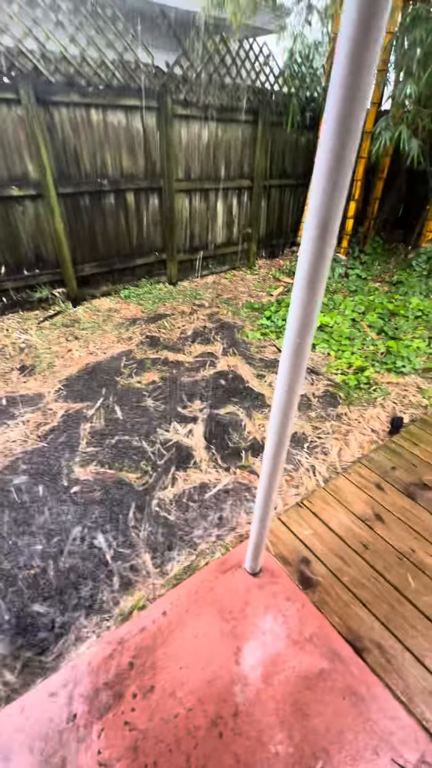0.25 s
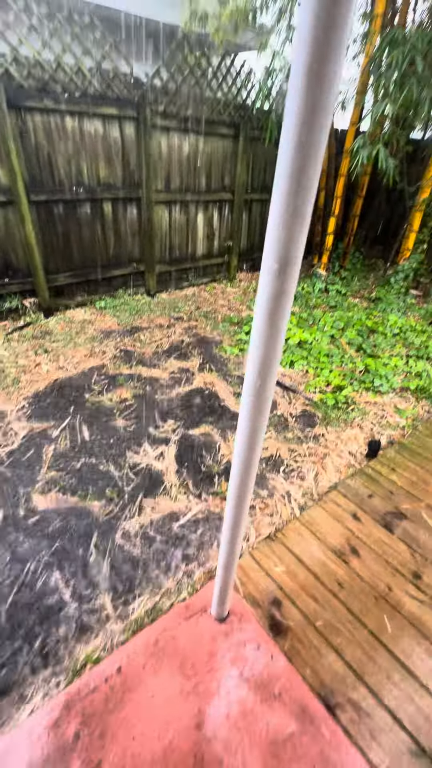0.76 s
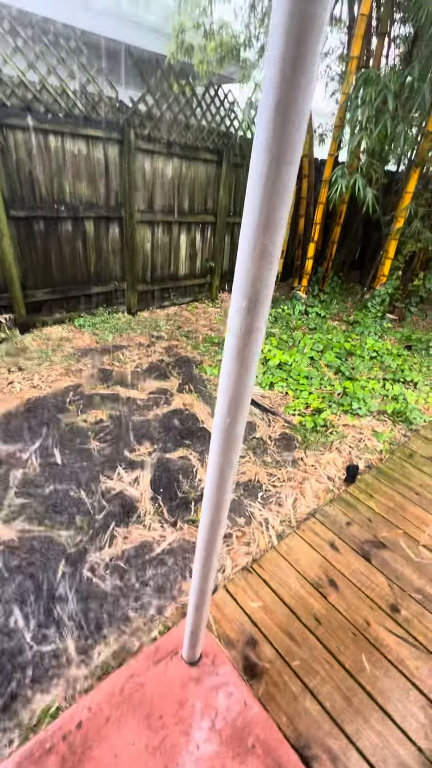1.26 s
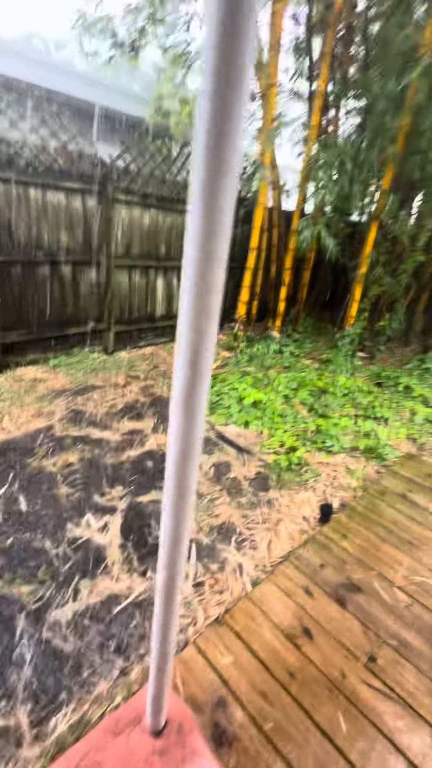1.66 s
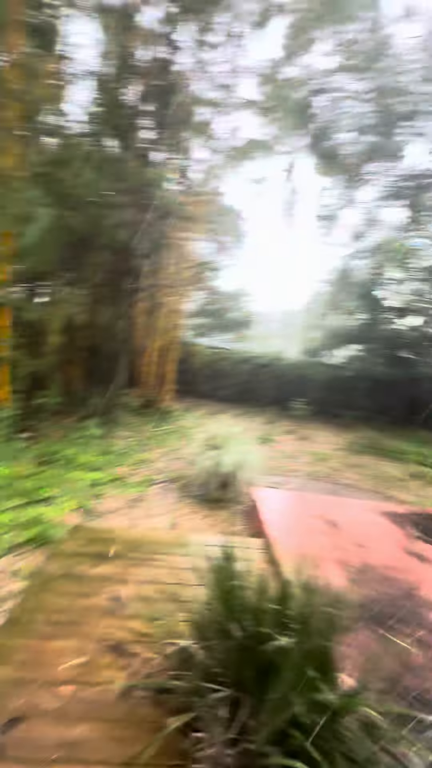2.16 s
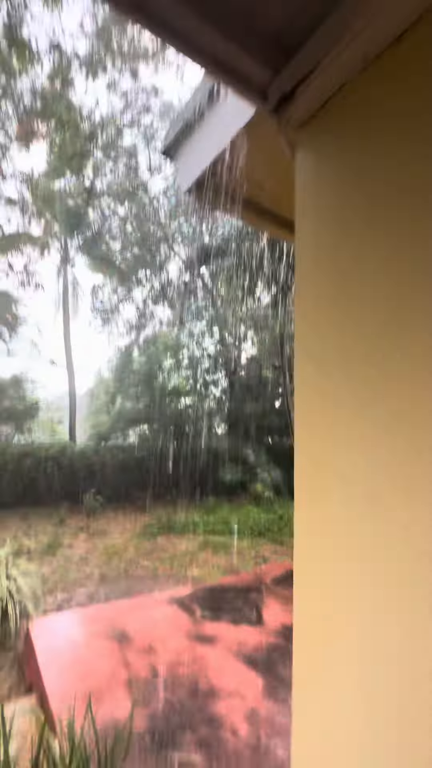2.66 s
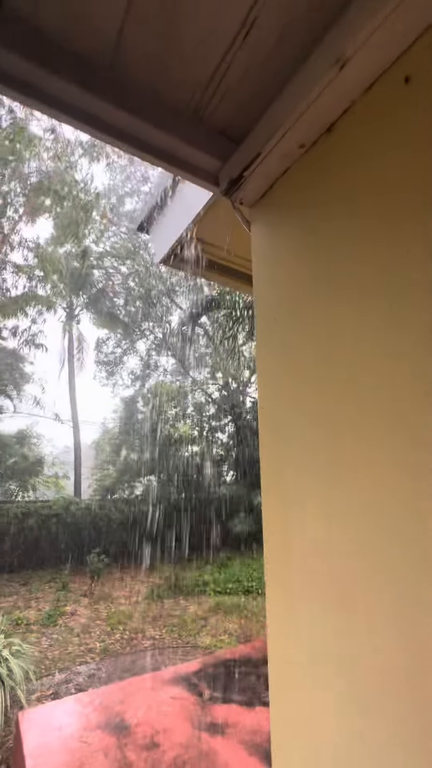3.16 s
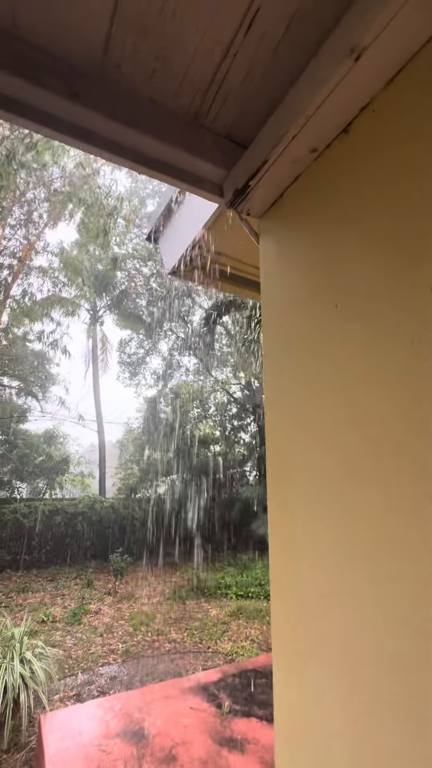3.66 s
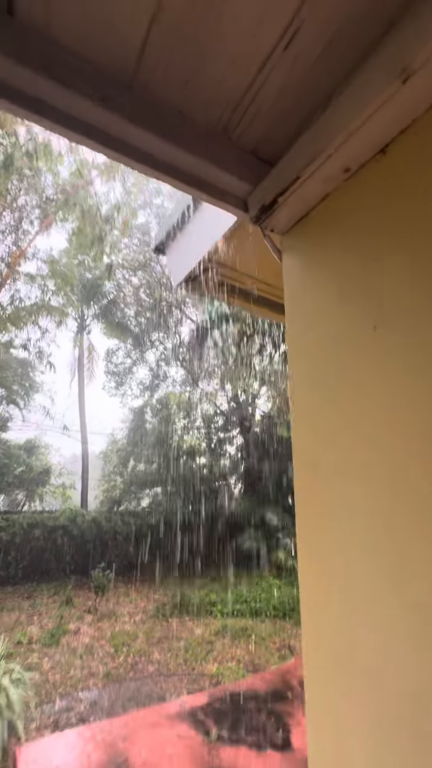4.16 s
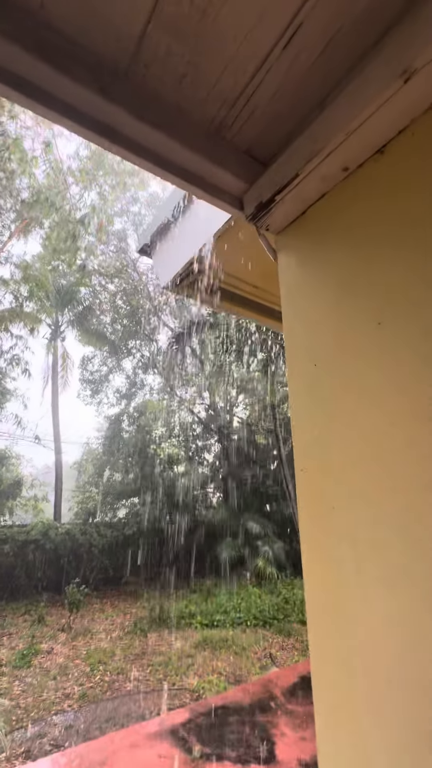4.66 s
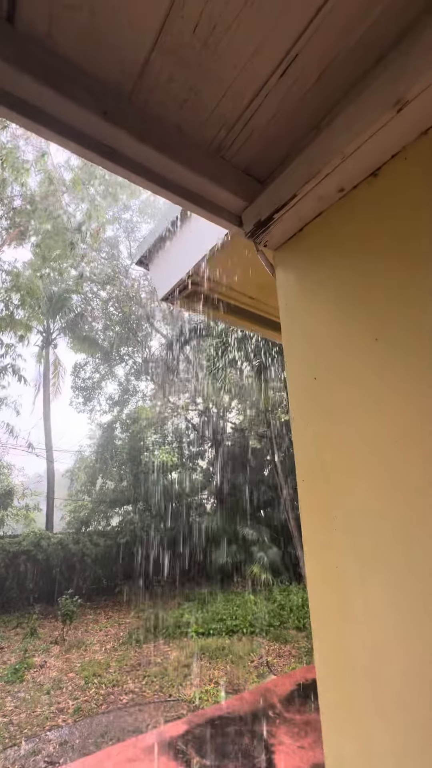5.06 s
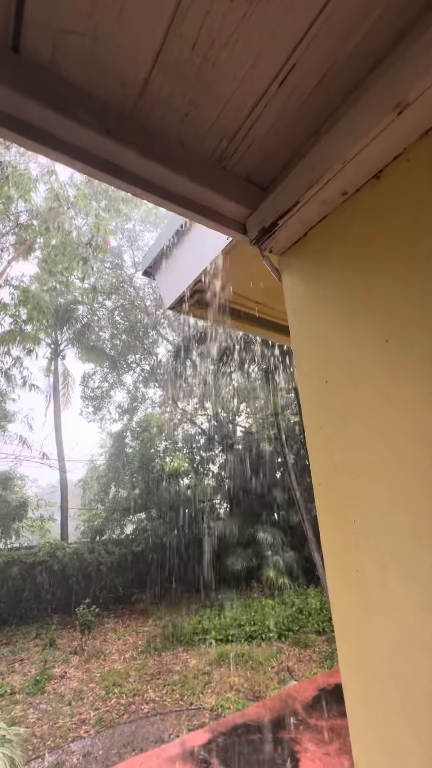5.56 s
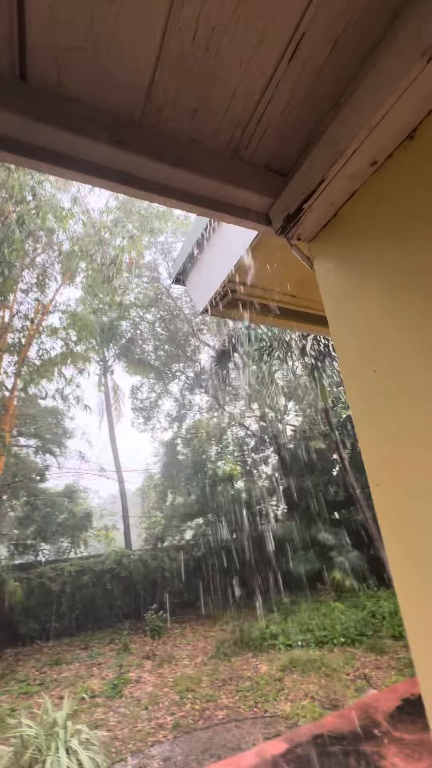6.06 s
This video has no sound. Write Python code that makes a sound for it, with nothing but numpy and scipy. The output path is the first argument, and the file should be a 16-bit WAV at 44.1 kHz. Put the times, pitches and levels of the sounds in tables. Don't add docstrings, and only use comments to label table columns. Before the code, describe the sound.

Heavy rain in a backyard, heard from under a roof overhang with a close stereo microphone. At first it is bright and open, with many crisp nearby drops and a faint gutter hum under a drumming roof. Around two seconds the microphone turns toward the dripping eaves: the patter gets duller, close drops become sparser, the gutter fades, and runoff keeps splashing in uneven gulps.

```python
import sys
import numpy as np
from scipy import signal
from scipy.fft import rfft, irfft, next_fast_len
from scipy.io import wavfile
from scipy.ndimage import uniform_filter1d

SR = 44100
rng = np.random.default_rng(int(sys.argv[2]) if len(sys.argv) > 2 else 0)


def generate_wav(signal):
    frames = np.transpose(np.atleast_2d(signal))
    scaled = np.clip(frames, -1, 1) * 32767
    pcm = np.round(scaled).astype(np.int16)
    wavfile.write(sys.argv[1], SR, pcm)


def gain_from_decibels(decibels):
    exponent = np.asarray(decibels, float) / 20
    return 10 ** exponent


N = 277830
CONTROL_STEP = 40

# (time [s], share facing the eaves [0-1])
TURN = [
    (1.75, 0.09),
    (2.6, 1),
]
# (time [s], level [dB])
UNDER_RAFTER = [
    (3.5, -1),
    (3.75, 3),
]

# (frequency [Hz], width [Hz], level [dB])
ROOF_MODES = [(65, 9.7, 0), (83.2, 22, -6)]
# (frequency [Hz], width [Hz], rms level [dB])
RAFTER_MODE = (107, 9.6, -44)
# (frequency [Hz], width [Hz], level [dB])
GUTTER_MODE = (306.3, 18.3, 1.5)
# (start [s], length [s], level [dB])
ROOF_BURSTS = [(0.071, 0.035, -36), (0.36, 0.146, -36), (0.96, 0.12, -37), (1.272, 0.04, -36),
               (1.843, 0.092, -35), (2.37, 0.104, -35), (2.563, 0.095, -35), (2.849, 0.11, -37),
               (3.016, 0.189, -34.5), (3.25, 0.13, -35), (3.405, 0.06, -38), (3.567, 0.19, -35.5),
               (3.838, 0.23, -36.5), (4.08, 0.2, -38.5), (4.29, 0.038, -32), (4.413, 0.25, -36.5),
               (5.078, 0.09, -34), (5.235, 0.12, -35.5), (5.415, 0.035, -35), (5.62, 0.03, -39),
               (5.76, 0.104, -36), (5.916, 0.096, -30.5)]

# (time [s], peak level [dB], ring [Hz],
# left-right level [dB], lag of right port [microseconds])
LARGE_DROPS = [(0.044, -24.5, 2500, -12, 172), (0.189, -17, 2700, 5, 202), (0.229, -16, 2700, -1, 200),
               (0.428, -19, 7900, 2, 70), (0.44, -14.5, 3480, -6, 199), (0.475, -23.5, 2680, -1, 200),
               (0.541, -14, 2500, 5, 257), (0.55, -23, 3300, -15, 262), (0.639, -17.5, 7500, 0, 201),
               (0.717, -20, 2900, 3, 232), (0.768, -13.5, 8300, 2, 180), (0.855, -18, 8100, -0.5, 199),
               (1.139, -18.5, 9200, 0, 191), (1.2, -18.5, 3080, 6, 242), (1.209, -15, 4330, -3, 232),
               (1.281, -16.5, 2500, -2, -230), (1.333, -19.5, 2590, 4, 230), (1.434, -20, 9700, 5, -250),
               (1.541, -15.5, 2840, -4, 230), (1.606, -11, 3800, -0.5, -250), (1.763, -14, 7500, -5, 74),
               (1.809, -18, 7500, 1, 67), (1.819, -21, 2900, 17, 37),
               (2.258, -16.5, 2460, -4.5, 166), (2.346, -22, 4330, -16, 161), (2.372, -20, 3400, 3, 165),
               (2.526, -22, 2950, -12, 155), (2.737, -16, 2690, 3, 189), (2.85, -24, 2800, 5, -200),
               (2.86, -18.5, 3430, 4, -140), (3.193, -20, 4800, -5, 135), (3.867, -19.5, 2520, -5, 57),
               (4.083, -22.5, 3260, 4.5, 66), (4.496, -16, 7900, 5, 36), (4.963, -14.5, 5940, -1, 160.5),
               (5.036, -23.5, 2580, -10, -270), (5.197, -16, 6030, 1, 109), (6.172, -18, 5230, -8, -79)]

# (time [s], level [dB])
DOWNPOUR = [(0.0, 1), (0.55, 0.4), (0.9, 0.8), (1.3, 0.6), (1.9, 0), (2.05, -1), (2.3, -1), (2.7, -0.8),
            (3.5, -0.3), (4.4, 0.7), (4.7, 0.2), (5.3, -0.1), (5.8, -0.2), (6.0, 0.6), (6.3, 1)]
# (time [s], swell [dB], centre frequency [Hz])
GULPS = [(0.17, 6.5, 5000), (0.27, 5, 1800), (0.3, 4, 3200), (0.46, 3, 4000), (0.55, 2.5, 2500),
         (0.65, 3.5, 3000), (0.85, 1, 900), (1.02, 1.5, 5000), (1.2, 5, 1300), (1.4, 2.5, 3000),
         (1.6, 1, 3500), (1.7, 1, 4000), (1.98, 2.5, 1000), (2.36, 3, 4500), (2.41, 5, 1000),
         (2.52, 1.5, 1200), (2.86, 4.5, 5000), (3.16, 2, 4000), (3.48, 4.5, 1100), (3.56, 2.5, 900),
         (3.88, 3, 3500), (4.38, -1.5, 3000), (4.5, -1.5, 6000), (4.84, 2.5, 1100), (4.96, 4, 4500),
         (5.22, 1.5, 5000), (5.51, 4, 3500), (5.96, 2, 1300), (6.04, 1, 5000), (6.17, 2, 4000)]
# (frequency [Hz], share [0-1])
GUSTINESS = [(4000, 0.86), (7000, 0.63), (12000, 0.27)]
# (frequency [Hz], density [dB per Hz])
SUM_YARD = [(40, 1), (150, -4.5), (400, -6.5), (900, -9), (1800, -9.5), (2500, -10.5), (3100, -5),
            (3900, -7), (5000, -8.5), (6100, -7.0), (7300, -10.5), (9000, -7.5), (10200, -11),
            (15500, -17.5)]
# (frequency [Hz], density [dB per Hz])
SUM_EAVES = [(40, 1.5), (150, -5.5), (400, -7.5), (900, -8), (1800, -10.5), (2500, -9), (3100, -6.5),
             (3900, -7.5), (5000, -10), (6100, -6), (7300, -11.5), (9000, -10.5), (10200, -13.5),
             (15500, -19.5)]
# (frequency [Hz], density [dB per Hz])
DIFF_YARD = [(40, -16), (200, -23.5), (450, -10), (850, -5.5), (1700, -10.5), (2100, -4.5), (2550, 1),
             (3000, -2.2), (3900, -13.5), (5000, -6.5), (6300, -6.5), (7700, -2.1), (11000, -8),
             (15500, -10.5)]
# (frequency [Hz], density [dB per Hz])
DIFF_EAVES = [(40, -16), (200, -24), (450, -12.5), (850, -7), (1700, -13), (2100, -7.5), (2550, -1),
              (3000, -5), (3900, -11), (5000, -5), (6300, -9), (7700, -6.5), (11000, -9.5), (15500, -13)]
# (frequency [Hz], in phase [-1..1], a quarter cycle ahead [-1..1])
LEAK_YARD = [(200, -0.17, -0.012), (500, -0.17, 0.18), (900, 0.03, 0.33), (1400, 0.0063, 0.28),
             (1750, -0.03, 0.09), (2500, -0.04, -0.04), (3100, -0.19, -0.24), (3800, -0.03, -0.09),
             (5000, 0.054, 0.01), (6200, -0.16, -0.03), (7500, -0.084, -0.1), (8500, 0.12, -0.31),
             (9500, 0.2, -0.52), (15200, -0.02, 0.46)]
# (frequency [Hz], in phase [-1..1], a quarter cycle ahead [-1..1])
LEAK_EAVES = [(200, -0.16, -0.13), (500, -0.19, 0.02), (900, -0.21, 0.25), (1400, -0.2, 0.36),
              (1750, -0.22, 0.22), (2500, -0.02, 0.2), (3100, 0.1, 0.01), (3800, 0.04, 0.03),
              (5000, -0.02, -0.09), (6200, -0.17, -0.13), (7500, -0.15, 0.07), (8500, -0.014, -0.21),
              (9500, 0.058, -0.34), (15200, -0.02, 0.49)]

# (frequency [Hz], level [dB])
SUM_TREBLE = [(9600, 0), (10330, -2), (10340, -60), (13780, -60), (13790, -1.5), (14470, 0), (14500, 1.5),
              (15600, 2.5)]
# (time [s], loss [dB])
TOP_LOSSES = [
    (0.165, -24),
    (1.21, -8),
    (2.05, -16),
    (2.33, -8),
    (3.67, -5),
    (3.81, -20),
]


def rms_one(x):
    return x / np.sqrt(np.mean(x ** 2) + 1e-20)


def in_time(rows):
    s, *columns = np.transpose(rows)
    return [np.interp(np.arange(N) / SR, s, c) for c in columns]


def at_hz(points, hz, order=1):
    points = np.array(points)
    return np.interp(np.log(hz + 1), np.log(points[:, 0]), points[:, order])


def every_sample(slow):
    return np.interp(np.arange(N) / CONTROL_STEP, np.arange(len(slow)), slow)


def drift(rate):
    r = np.exp(-2 * np.pi * rate * CONTROL_STEP / SR)
    noise = rng.standard_normal(N // CONTROL_STEP + 2002)
    slow = signal.lfilter([1], [1, -2 * r, r * r], noise)[2000:]
    return every_sample(rms_one(slow))


def bump(at_s, half_s):
    t = np.arange(0, N, CONTROL_STEP) / SR
    return np.exp(-.5 * ((t - np.asarray(at_s)[:, None]) / half_s) ** 2)


def resonance(x, hz, width_hz):
    r = np.exp(-np.pi * width_hz / SR)
    zeros = np.array([1, 0, -1]) * (1 - r * r) / 2
    return signal.lfilter(zeros, [1, -2 * r * np.cos(2 * np.pi * hz / SR), r * r], x)


def double_resonance(x, hz, width_hz):
    return resonance(resonance(x, hz, width_hz), hz, 2 * width_hz)


def evened(x, span_s):
    power = uniform_filter1d(x ** 2, round(span_s * SR))
    return x / np.sqrt(power + 0.087 * np.mean(x ** 2))


def roof_bursts():
    rest_db, edge_s = -42.5, 0.058
    t, gain = np.arange(N) / SR, gain_from_decibels(rest_db)
    for start, length, db in ROOF_BURSTS:
        inside_s = np.minimum(t - start, start + length - t)
        gain = gain + gain_from_decibels(db) * np.clip(.5 + inside_s / edge_s, 0, 1)
    return gain


def gutter_level_db():
    yard_db, eaves_db, flutter_db = -40, -49, 2
    hidden = np.minimum(4 * in_time(TURN)[0], 1)
    return yard_db + hidden * (eaves_db - yard_db) + flutter_db * drift(4.4)


def roof():
    roof_db, left_right_db = -2, [[-.3], [.3]]
    on_roof, on_edge = rng.standard_normal((2, N))
    deep = 0
    for hz, width, db in ROOF_MODES:
        deep = deep + gain_from_decibels(db) * rms_one(double_resonance(on_roof, hz, width))
    hz, width, db = RAFTER_MODE
    rafter_db = db + in_time(UNDER_RAFTER)[0]
    rafter = gain_from_decibels(rafter_db) * evened(double_resonance(on_edge, hz, width), span_s=0.33)
    hz, width, db = GUTTER_MODE
    gutter = gain_from_decibels(db + gutter_level_db()) * evened(resonance(on_edge, hz, width), span_s=0.11)
    hum = roof_bursts() * evened(deep, span_s=0.069) + rafter + gutter
    return gain_from_decibels(roof_db) * hum * gain_from_decibels(left_right_db)


def drops():
    drop_db, spatter_db, spatter_fade_s = 0.5, -8, 0.0045
    length, lead_s = 800, .0003
    out, t = np.zeros((2, N + length)), np.arange(length) / SR
    for s, db, hz, pan_db, lag_us in LARGE_DROPS:
        noise = rng.standard_normal(length)
        spatter = gain_from_decibels(spatter_db) * rms_one(resonance(noise, hz, 0.22 * hz)) * np.exp(-t / spatter_fade_s)
        start = round((s - lead_s) * SR)
        for port, sign in enumerate([1, -1]):
            age = np.clip(t - lead_s + sign * lag_us * 5e-7, 0, 1) * hz
            smack = np.e * age * np.exp(-age) * np.sin(2 * np.pi * age)
            gain = gain_from_decibels(db + drop_db + sign * pan_db / 2)
            out[port, start:start + length] += gain * (smack + spatter * (age > 1))
    return out[:, :N]


def impacts(per_s, spread_db):
    size_db = spread_db * np.minimum(rng.exponential(1, (2, N)), 4.5)
    sizes = gain_from_decibels(size_db) * rng.choice([-1, 1], (2, N))
    return rms_one(sizes * (rng.random((2, N)) < per_s / SR))


def rain_field(near_db, patchy_db):
    gulp_half_s, gulp_octaves = 0.017, 0.9
    strength_db, = in_time(DOWNPOUR)
    s, swell_db, centre_hz = np.transpose(GULPS)
    swells = bump(s, gulp_half_s)
    edges = 30 * 2 ** np.arange(0, 9.3, .4)
    clumps = gain_from_decibels(1.3 * drift(12))
    far = rng.standard_normal((2, 2, N))
    near = [impacts(per_s=900, spread_db=db) * clumps for db in (6.5, 3.0)]
    out = 0
    for k, (low, high) in enumerate(zip(edges, edges[1:])):
        hz = np.sqrt(low * high)
        band_near_db = at_hz(near_db, hz)
        source = far[k % 2] + gain_from_decibels(band_near_db) * near[k % 2]
        band = signal.sosfilt(signal.butter(2, [low, high], "band", fs=SR, output="sos"), source)
        nearness = np.exp(-.5 * (np.log2(hz / centre_hz) / gulp_octaves) ** 2)
        level_db = strength_db + every_sample((swell_db * nearness) @ swells)
        swing_db = level_db * at_hz(GUSTINESS, hz) + patchy_db * drift(19.4)
        out = out + band * gain_from_decibels(swing_db) / np.sqrt(1 + gain_from_decibels(2 * band_near_db))
    return out


def ports(field, total, difference, leak):
    size = next_fast_len(N + 4096)
    hz = np.arange(size // 2 + 1) * SR / size
    a, b = rfft(field, size)
    share = at_hz(leak, hz) + 1j * at_hz(leak, hz, order=2)
    rest = np.sqrt(np.clip(1 - abs(share) ** 2, 0, 1))
    mid = a * gain_from_decibels(at_hz(total, hz))
    side = (share * a + rest * b) * gain_from_decibels(at_hz(difference, hz))
    return irfft([mid + side, mid - side], size)[:, :N]


def rain():
    rain_db = -16.5
    near_db = [(300, -15.5), (1000, -9.5), (3000, -6.0), (6000, -11.0), (12000, -7)]   # (Hz, dB re far hiss)
    field = rain_field(near_db, patchy_db=1.26)
    eaves, = in_time(TURN)
    yard_side = ports(field, SUM_YARD, DIFF_YARD, LEAK_YARD)
    eaves_side = ports(field, SUM_EAVES, DIFF_EAVES, LEAK_EAVES)
    return gain_from_decibels(rain_db) * ((1 - eaves) * yard_side + eaves * eaves_side)


def scene():
    return roof() + drops() + rain()


def band_limit(x):
    return signal.sosfilt(signal.butter(12, 15800, fs=SR, output="sos"), x)


def record(dry):
    left, right = rfft(signal.sosfilt(signal.butter(5, 47, "high", fs=SR, output="sos"), dry))
    hz = np.arange(len(left)) * SR / N
    passed = hz < 15750
    mid = (left + right) / 2 * gain_from_decibels(at_hz(SUM_TREBLE, hz)) * passed
    side = irfft((left - right) / 2 * passed, N)
    zone = np.digitize(hz, [9650, 12000, 15160])
    body, rim, ledge, top = irfft(mid * (zone == np.arange(4)[:, None]), N)
    s, loss_db = np.transpose(TOP_LOSSES)
    loss_db = every_sample(loss_db @ bump(s, half_s=0.013))
    rim_db = 1.2 * drift(25)
    ledge_db = -1.3 + 1.6 * in_time(TURN)[0] + 1.7 * drift(12) + loss_db
    top_db = 2.2 + loss_db
    mid = body + rim * gain_from_decibels(rim_db) + ledge * gain_from_decibels(ledge_db) + top * gain_from_decibels(top_db)
    return band_limit(np.array([mid + side, mid - side]))


dry = scene()
out = record(dry)
generate_wav(out)
```